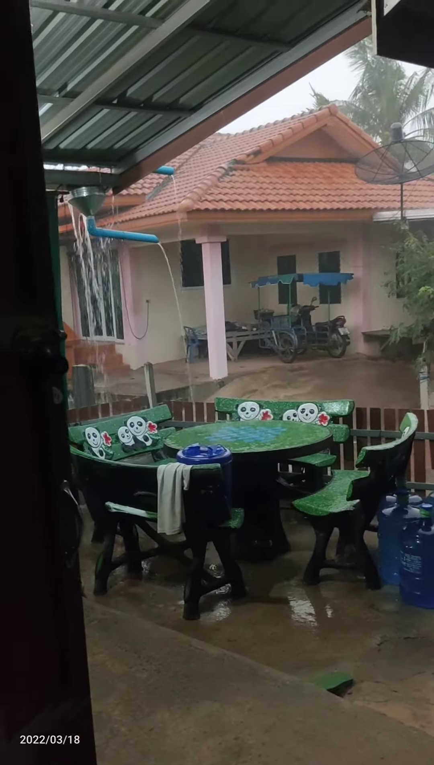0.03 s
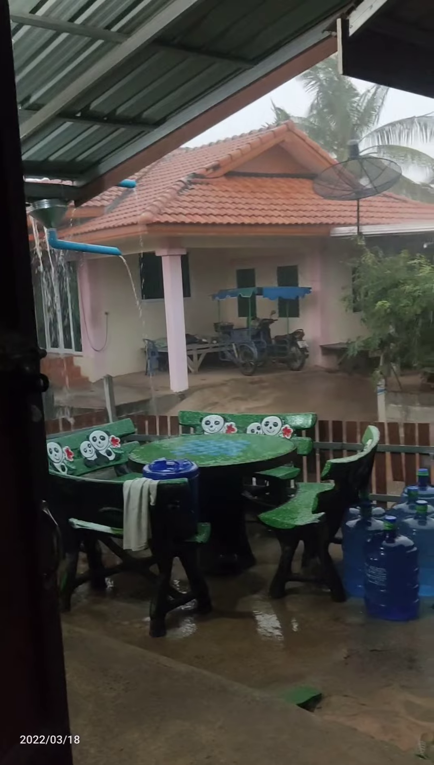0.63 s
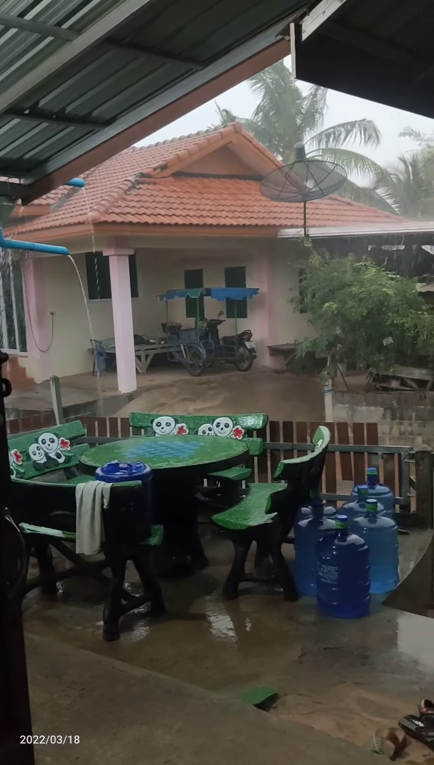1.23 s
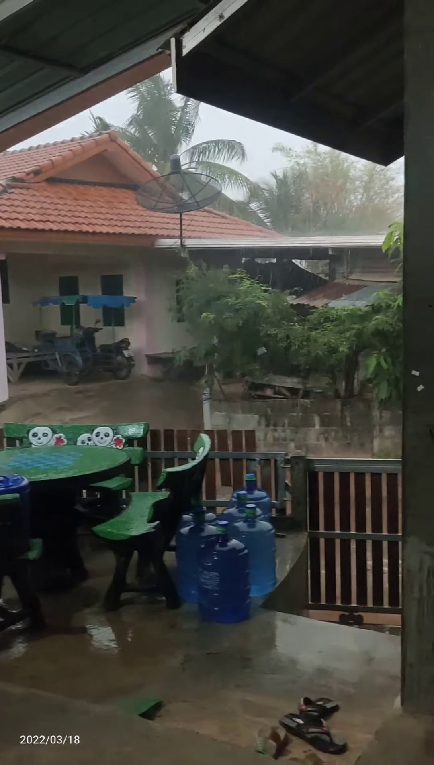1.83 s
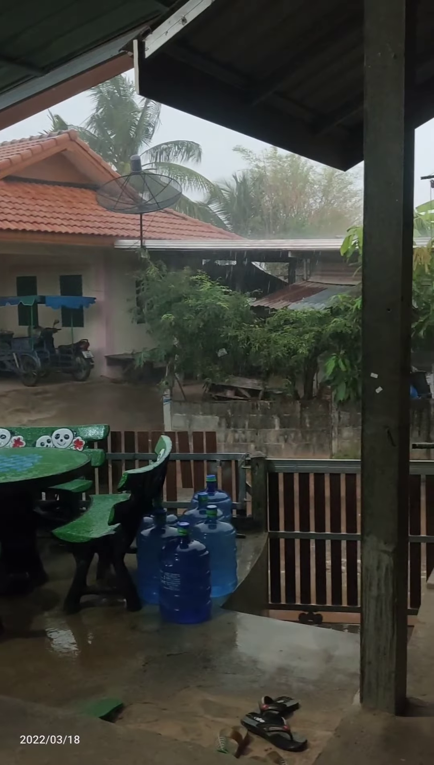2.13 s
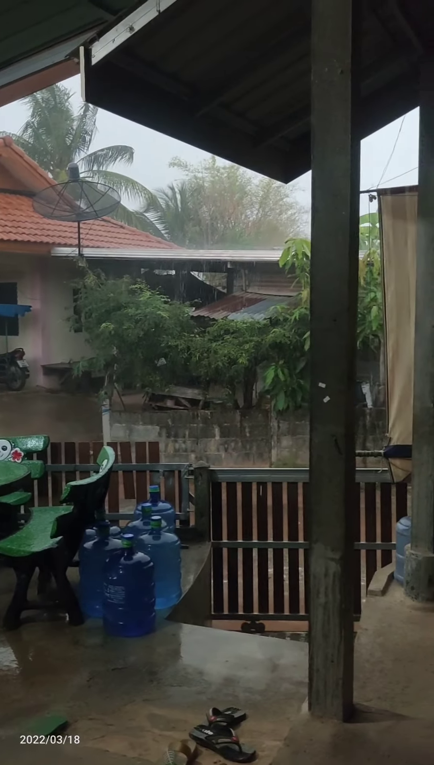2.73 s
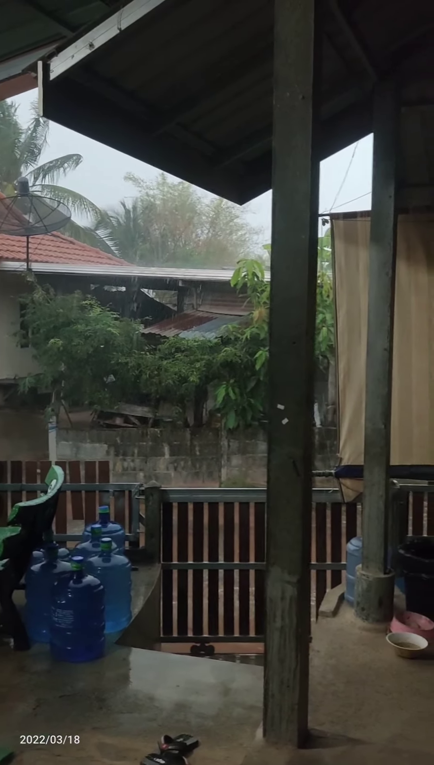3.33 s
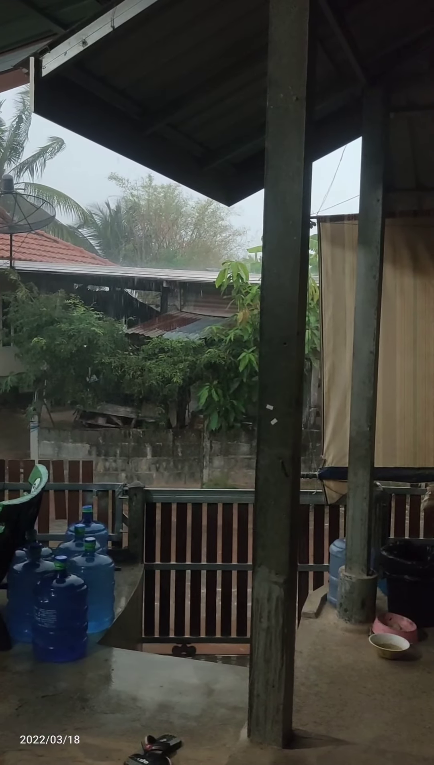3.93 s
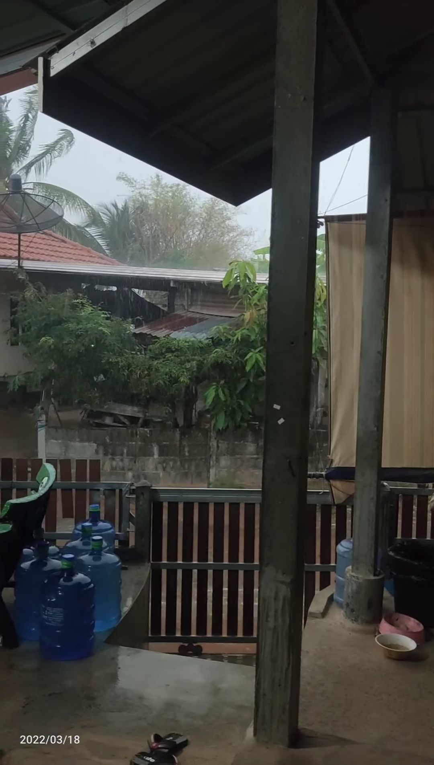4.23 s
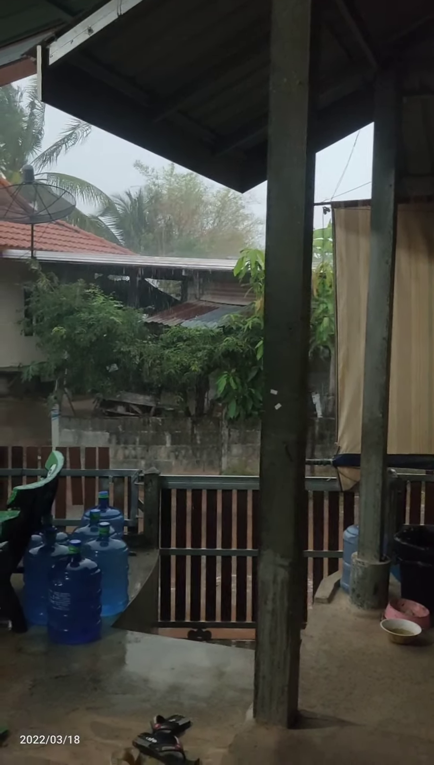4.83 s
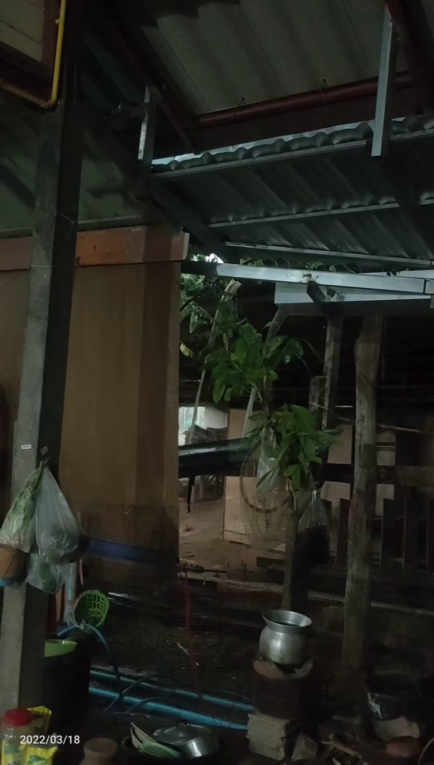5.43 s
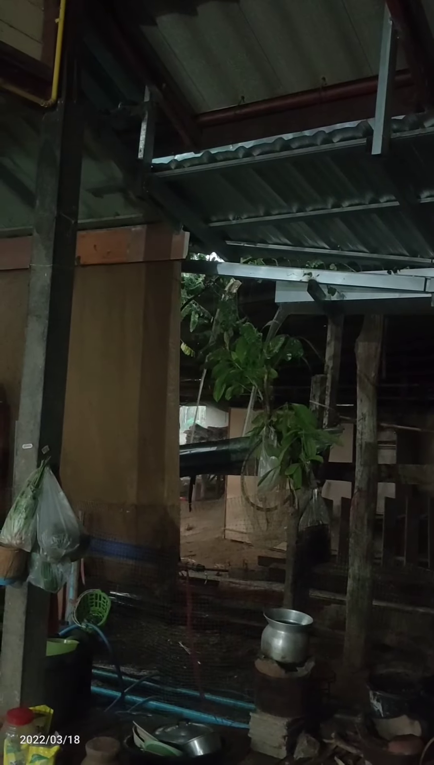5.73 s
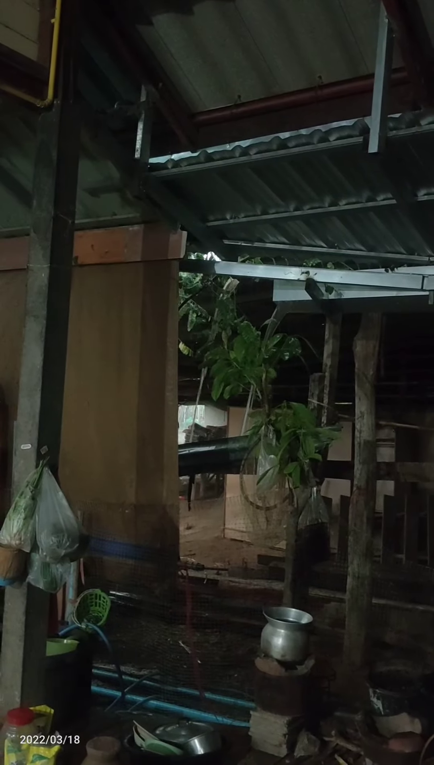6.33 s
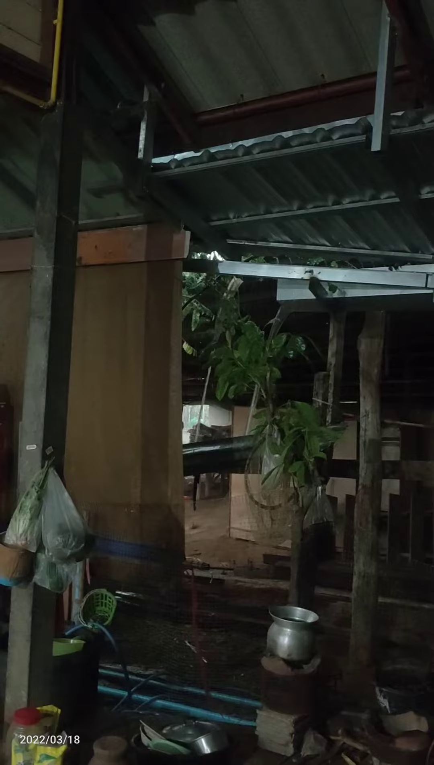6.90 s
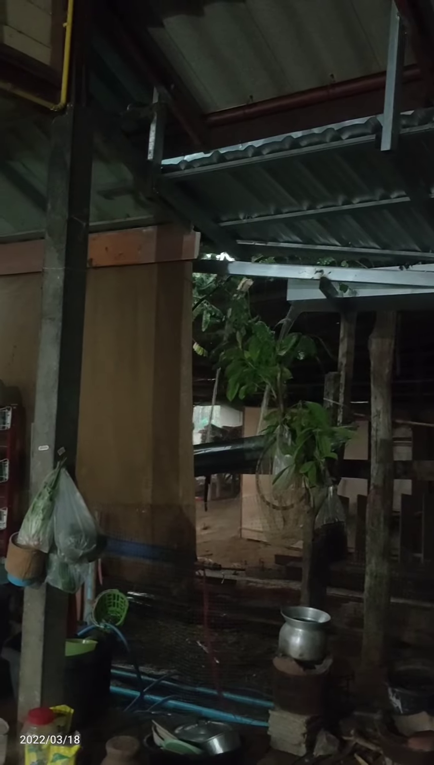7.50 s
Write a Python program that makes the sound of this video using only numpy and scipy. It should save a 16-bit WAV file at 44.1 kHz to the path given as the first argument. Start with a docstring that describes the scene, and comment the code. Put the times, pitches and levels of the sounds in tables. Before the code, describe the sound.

Heavy rain drums steadily on a corrugated metal roof overhead, with faint spray hissing behind and one brief cut to silence.

```python
"""Heavy rain drums on a corrugated metal roof, heard from underneath. Each drop makes a metal sheet
ring briefly, and gusts throw on more rain. Behind it, spray hisses in the yard and swells when
water spills from the eaves. On the patio the listener turns away from the loudest sheets; near
five seconds the sound cuts out, then fades in under a lower roof, where the drumming is fuller."""
import sys
import numpy as np
from scipy import signal
from scipy.fft import rfft, irfft, next_fast_len
from scipy.io import wavfile

SR = 44100
rng = np.random.default_rng(int(sys.argv[2]) if len(sys.argv) > 2 else 0)


def digitize_waveform(pressure):
    """Quantize a signal to 16-bit integers and store it at the path in sys.argv[1].

    Rows of a 2-D input are taken as channels; values are limited to [-1, 1].
    """
    field = np.atleast_2d(pressure).T
    bounded = np.clip(field, -1, 1)
    quanta = np.round(bounded * 32767).astype(np.int16)
    wavfile.write(sys.argv[1], SR, quanta)


N = 337806
TIME_S = np.arange(N) / SR


def gain_of(db):
    """Turns decibels into a number to multiply a sound by."""
    return 10 ** (np.asarray(db) / 20)


def normalised(sound):
    """Scales a sound so that its average strength (rms) is 1."""
    return sound / np.sqrt(np.mean(sound ** 2) + 1e-20)


def look_up(table, hz):
    """Reads between a table's rows, spacing pitches by octaves."""
    pitch_hz, value = np.transpose(table)
    return np.interp(np.log(hz + 1), np.log(pitch_hz + 1), value)


def shape_tone(sound, tone):
    """Turns each pitch up or down as the table says, falling steeply above its last row."""
    size = next_fast_len(N)
    hz = np.fft.rfftfreq(size, 1 / SR)
    roll_off = 1 / np.maximum(hz / tone[-1][0], 1) ** 8
    return irfft(rfft(sound, size) * gain_of(look_up(tone, hz)) * roll_off, size)[:N]


def split(sound, hz):
    """The parts of a sound below and above a pitch."""
    low = signal.sosfiltfilt(signal.butter(4, hz, fs=SR, output="sos"), sound)
    return low, sound - low


def wander(turns_per_s):
    """A random curve that drifts up and down."""
    points = rng.standard_normal(4096)
    return normalised(np.interp(TIME_S * turns_per_s, np.arange(len(points)), points))


def sink(start_s, end_s, drop_db):
    """A level in dB that starts at 0, sinks evenly, then stays down."""
    return -drop_db * np.clip((TIME_S - start_s) / (end_s - start_s), 0, 1)


def swells(table):
    """One smooth rise and fall in dB for each row."""
    return sum(rise_db * np.cos(np.pi * np.clip((TIME_S - peak_s) / length_s, -.5, .5)) ** 2
               for peak_s, length_s, rise_db in table)


def drops(per_s, spread_db):
    """Drops land at random moments: many small ones and a few large ones."""
    size = gain_of(spread_db * np.minimum(rng.exponential(1, N), 4))
    sign = rng.choice([-1, 1], N)
    lands = rng.random(N) < per_s / SR
    return normalised(size * sign * lands)


# Water spilling from the eaves and splashing in the yard: peak_s, length_s, rise_db
EAVES_SPILLS = [(0.22, 0.31, 4), (0.63, 0.25, 2), (1.13, 0.35, 2.7), (3.23, 0.4, 2.8), (3.64, 0.16, 2.2),
                (5.13, 0.2, 3), (5.37, 0.14, 0.5), (5.62, 0.13, 4.3), (6, 0.25, 1.6), (6.78, 0.14, 4),
                (7.03, 0.22, 2.6)]
# How strong the spray is at each pitch: pitch_hz, gain_db
SPRAY_TONE = [(1500, -21), (4500, -11.5), (5500, 1), (6300, 3.5), (6900, -0.5), (10000, -1), (11500, -5),
              (14000, -2.5), (18000, -8.5)]


def yard_spray(flurry_db=0.7):
    """Tiny splashes over a smooth, distant hiss; they stand out at each spill."""
    spill_db = swells(EAVES_SPILLS)
    splashes = drops(per_s=7000, spread_db=3.0) * gain_of(1.25 * spill_db)
    mist = gain_of(3 + 0.7 * spill_db) * rng.standard_normal(N)
    coarse, fine = split(shape_tone(splashes + mist, SPRAY_TONE), hz=8000)
    coarse *= gain_of(flurry_db * wander(turns_per_s=16))
    fine *= gain_of(flurry_db * wander(turns_per_s=16))
    return normalised(coarse + fine)


# How long a struck sheet takes to die away by 60 dB: pitch_hz, ring_s
SHEET_RING_TIMES = [(150, 0.17), (700, 0.092), (2000, 0.054), (5000, 0.03)]


def metal_sheet(tick=0.81):
    """One drop hits: a tick, then the sheet bends and rings at many pitches, the high ones dying first."""
    hz, time_s, noise = signal.stft(rng.standard_normal(SR // 4), SR, nperseg=256)
    decay = gain_of(-60 * time_s / look_up(SHEET_RING_TIMES, hz)[:, None])
    ring = signal.istft(noise * decay, SR, nperseg=256)[1]
    ring /= np.linalg.norm(ring)
    ring[0] += tick
    return ring


def roof_drumming(sheets=20, flurry_db=1.0, roar_db=-3.5):
    """Flurries of drops sweep over the near sheets; the rest of the roof blurs into a roar."""
    near = np.zeros(N)
    for _ in range(sheets):
        hits = drops(per_s=850, spread_db=2.9) * gain_of(flurry_db * wander(turns_per_s=16))
        near += signal.oaconvolve(hits, metal_sheet())[:N]  # every hit starts a ring
    roar = gain_of(roar_db) * rng.standard_normal(N)
    return normalised(near) + roar


# Brief swells in the drumming: gusts, plus a short jump in loudness at 5.12 s as the sound
# fades back in: peak_s, length_s, rise_db
DRUMMING_SWELLS = [(0.21, 0.19, 2), (0.8, 0.37, 0.9), (1.09, 0.44, 2), (1.53, 0.17, 1.3), (1.74, 0.16, 2),
                   (1.98, 0.09, 1.5), (2.11, 0.12, 1.6), (2.4, 0.2, 1.5), (3.31, 0.1, 2), (4.88, 0.15, 2),
                   (5.12, 0.09, 2.7), (5.295, 0.17, 3), (5.6, 0.3, 1.6), (6.12, 0.1, 0.7),
                   (6.53, 0.14, 1.5)]
# Calmer moments between the swells: deepest_s, length_s, drop_db
DRUMMING_LULLS = [(0.03, 0.21, 0.5), (0.46, 0.13, 1.8), (1.39, 0.19, 1.5), (5.2, 0.08, 0.2),
                  (7.18, 0.24, 1.5)]


def under_roof(drumming, away_db, boom_db, boom_follow, patter_db, patter_follow):
    """The drumming swells and dips. The boom comes from all round, so turning dims the patter more."""
    boom, rest = split(drumming, hz=400)
    middle, patter = split(rest, hz=1500)
    swell_db = swells(DRUMMING_SWELLS) - swells(DRUMMING_LULLS)
    # A "follow" setting says how strongly that part sinks along with away_db.
    boom = normalised(boom) * gain_of(boom_db + boom_follow * away_db + 0.49 * swell_db)
    middle = normalised(middle) * gain_of(away_db + swell_db)
    patter = normalised(patter) * gain_of(patter_db + patter_follow * away_db + 0.71 * swell_db)
    return boom + middle + patter


# How strong the patio roof is at each pitch: pitch_hz, gain_db
PATIO_TONE = [(35, -49), (80, -29), (115, -21), (165, -10.5), (320, -6), (500, -2.5), (600, -0.7), (700, 2),
              (1050, 1.1), (1220, -2.2), (1380, -2.2), (1540, -6.5), (2300, -10.5), (3000, -14),
              (3330, -16), (4100, -24), (5000, -36.5)]


def patio_roof(drumming):
    """On the patio the drumming softens as the listener turns away from the loudest sheets."""
    away_db = sink(start_s=1.52, end_s=4.5, drop_db=4.5)
    return under_roof(shape_tone(drumming, PATIO_TONE), away_db,
                      boom_db=-13.0, boom_follow=0.38, patter_db=-5.0, patter_follow=1.0)


# How strong the lower roof is at each pitch: pitch_hz, gain_db
LOW_ROOF_TONE = [(35, -48), (80, -28.5), (115, -20), (185, -10), (300, -7.5), (560, -1), (725, 2),
                 (810, 0.5), (930, 1), (1220, -3), (1380, -3.3), (1520, -7.5), (1850, -8), (2300, -10.5),
                 (3250, -16), (4000, -24.5), (5000, -37)]


def low_roof(drumming):
    """Under the lower roof the drumming has more boom, and eases a little near the end."""
    away_db = sink(start_s=6.5, end_s=7.5, drop_db=1.66)
    return under_roof(shape_tone(drumming, LOW_ROOF_TONE), away_db,
                      boom_db=-11.0, boom_follow=0.89, patter_db=-4.5, patter_follow=1.13)


def brief_silence(cut_s=4.921, cut_db_per_s=3799, silent_db=-94, back_s=5.108, fade_in_s=0.13):
    """A volume curve: a quick fade out, then a slower fade in that levels off."""
    out_db = -cut_db_per_s * np.maximum(TIME_S - cut_s, 0)
    in_db = silent_db * np.clip((back_s - TIME_S) / fade_in_s, 0, 1) ** 2
    return gain_of(np.maximum(out_db, in_db))


def scene(roof_db=-30.5, move_s=4.96):
    """First the patio, then the lower roof, with a brief silence between."""
    drumming, spray = roof_drumming(), yard_spray()
    first_spot = spray * gain_of(-56.5 + sink(start_s=1.5, end_s=3, drop_db=4))
    first_spot += patio_roof(drumming) * gain_of(roof_db)
    second_spot = spray * gain_of(-57.8 + sink(start_s=6, end_s=7.5, drop_db=1))
    second_spot += low_roof(drumming) * gain_of(roof_db)
    rain = np.where(TIME_S < move_s, first_spot, second_spot)
    return (rain * brief_silence())[None]


def record(dry):
    """Steeply cuts away the very highest pitches."""
    treble_cut = signal.firwin(1023, cutoff=15520, window=("kaiser", 9), fs=SR)
    return signal.oaconvolve(dry, treble_cut[None], "same")


dry = scene()
out = record(dry)
digitize_waveform(out)
```